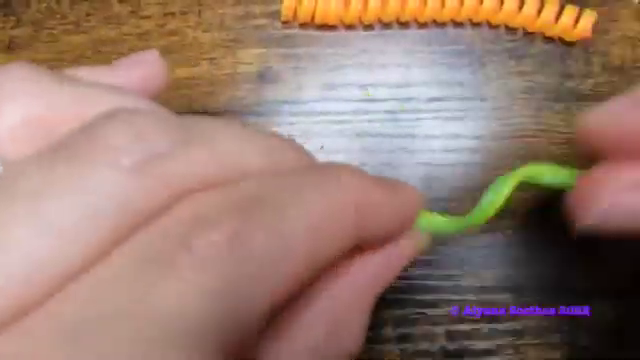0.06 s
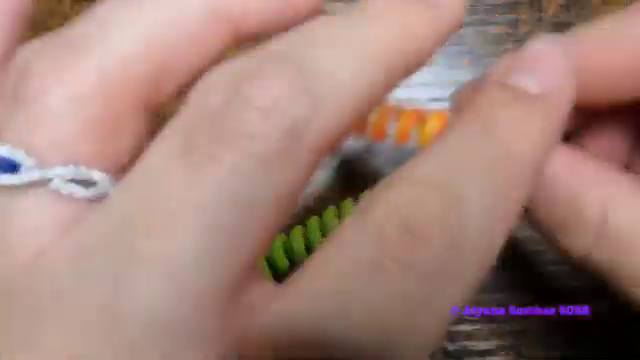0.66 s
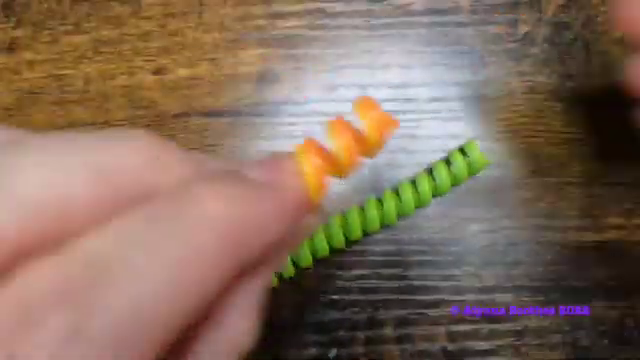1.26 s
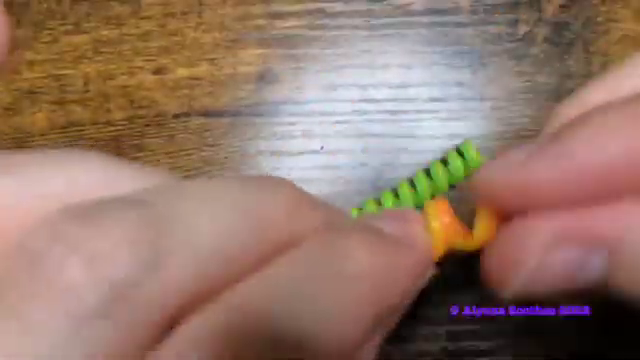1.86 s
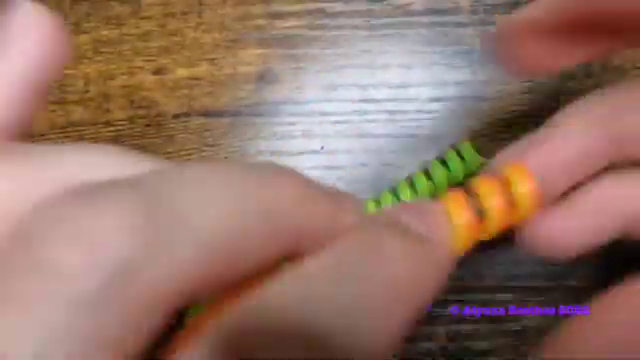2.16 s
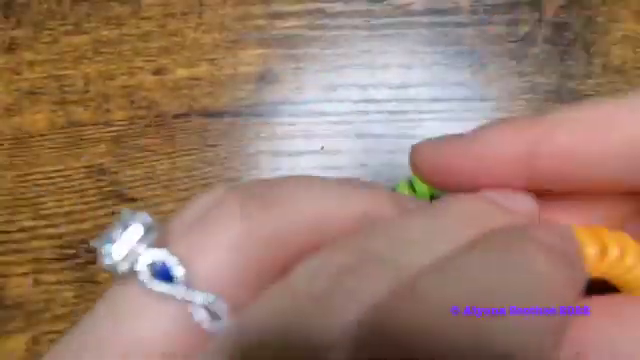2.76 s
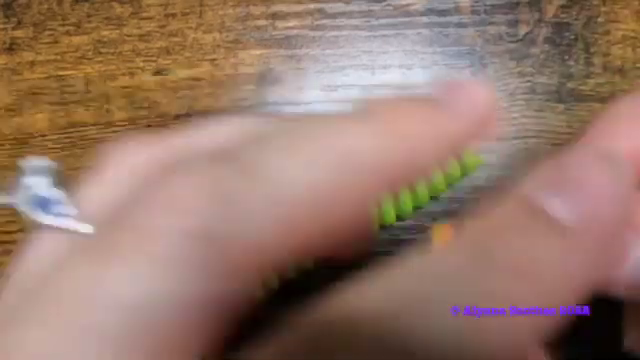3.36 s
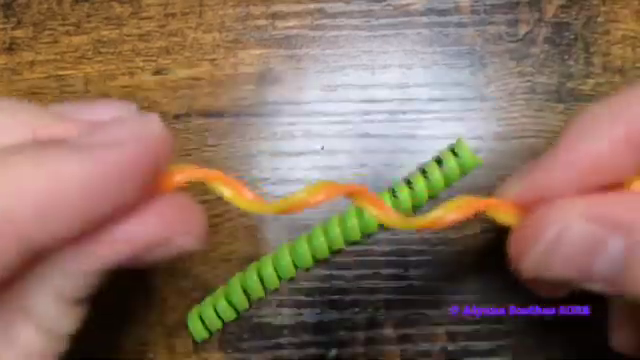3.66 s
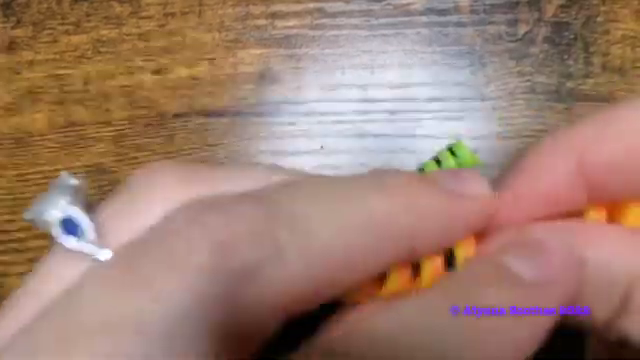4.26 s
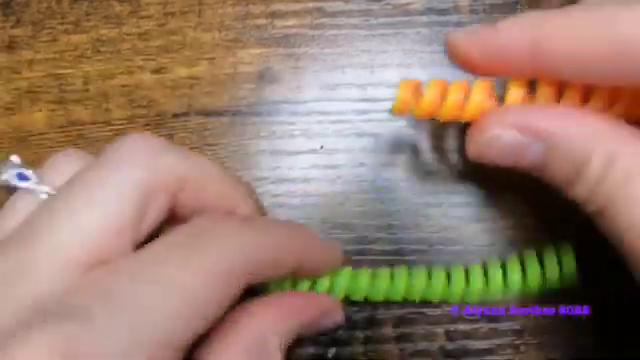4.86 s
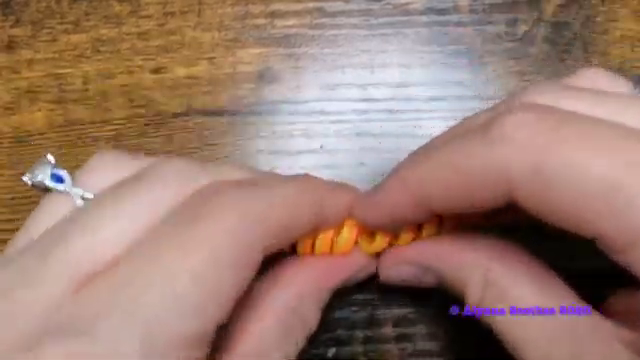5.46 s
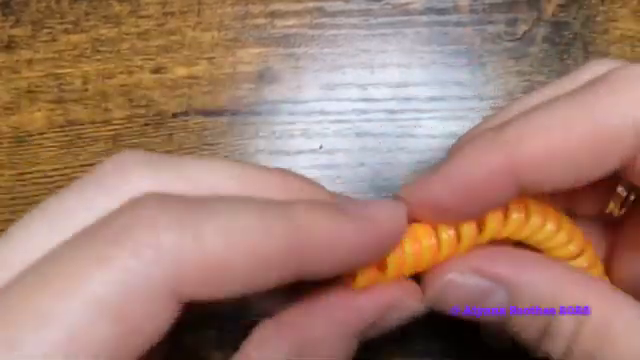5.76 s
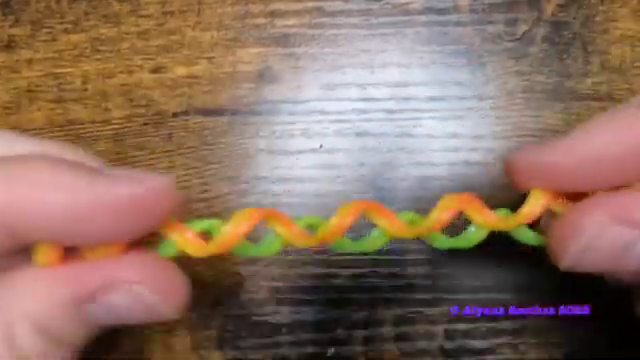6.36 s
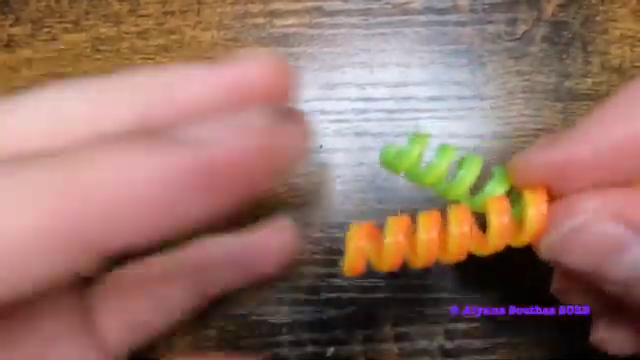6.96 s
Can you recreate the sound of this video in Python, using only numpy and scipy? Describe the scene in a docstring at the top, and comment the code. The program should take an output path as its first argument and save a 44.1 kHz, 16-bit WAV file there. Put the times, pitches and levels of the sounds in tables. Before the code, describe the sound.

Two plastic spiral springs are handled close to the microphone, just above a wooden table in a small, fairly dry room. A steady low hum and a faint rumble of stirred air run throughout. Light ticks and a small snap at 0.3 seconds are followed by a soft thump at 0.5 and a sharp knock on the wood at 0.6. Coils snap shut crisply at about 1.1, 1.6, 2.1 and 3.2 seconds, with soft finger rubbing and stray clicks between. From 3.6 to 4.7 seconds, uneven runs of ticks come as a spring is stretched, with a snap at 4.0 and the loudest at 4.6. Around 4.9 seconds fingertips and springs thump the table, then the springs roll faintly on the wood with light bumps until 5.6. A strong snap comes at 6.4, two more at 6.7 and 6.8, then faint rubbing.

```python
"""In a small room, just above a wooden table, two plastic spiral springs are stretched, let go and rolled
between fingers. Released coils snap shut with a puff of air and turns tick over each other, each impact
exciting the spring's resonances. Springs and fingertips knock on the tabletop and set its modes ringing;
skin slides on plastic by stick-slip friction. The moving hands stir the air, and a low hum fills the room."""
import sys
import numpy as np
from scipy import signal
from scipy.fft import rfft, irfft, next_fast_len
from scipy.io import wavfile
from scipy.ndimage import uniform_filter1d, map_coordinates

SR = 44100
rng = np.random.default_rng(int(sys.argv[2]) if len(sys.argv) > 2 else 0)


def bounce(signal):
    """Save signal as a 16-bit WAV file at the path given by the first command-line argument."""
    frames = np.transpose(np.atleast_2d(signal))
    limited = np.clip(frames, -1, 1)
    pcm = np.round(limited * 32767).astype(np.int16)
    wavfile.write(sys.argv[1], SR, pcm)


N = 313551
T = np.arange(N) / SR
IMPACT_T = T[:SR // 3]

# A spring snaps shut; levels are relative within each column:
# time_s, level_db, knock_db, body_db, sheen_db, push_db, pan_db, release_db
SNAPS = [(0.2958, -35, -22, -17, -22, -38.5, -2.5, -16), (1.1469, -24.5, -23, -16, -15, -33, -0.5, -17.5),
         (1.6457, -25, -29, -24, -13, -36.5, 0.5, -20), (2.0662, -30.5, -19, -13.5, -20.5, -37.5, 0, -24),
         (3.203, -21, -15.5, -17.5, -17, -32.5, -1, -20.5),
         (3.9925, -28.5, -19.5, -14.5, -16.5, -34, -1, -13.5),
         (4.6043, -16.5, -26.5, -16.5, -26, -33.5, -2.5, -22),
         (6.3934, -20.5, -24.5, -16, -28.5, -49.5, 5, -41), (6.7038, -28, -27, -23, -16, -40, 0.5, -18),
         (6.8003, -23, -23.5, -30, -16, -37, -0.5, -40)]


def snaps():
    """Elastic recoil: the end slips off a fingertip, and 5 ms later the turns slam together."""
    out = np.zeros((2, N))
    edge_db = -14.5
    for s, db, knock_db, body_db, sheen_db, push_db, pan_db, release_db in SNAPS:
        registers_db = [knock_db, body_db, edge_db, sheen_db]
        release = coil_click(registers_db, chatter=5.9, chatter_t60_s=0.012)
        slam = coil_click(registers_db, chatter=2.2, chatter_t60_s=0.0079)
        puff = air_push(width_s=0.0019, tail=3.5)
        add(out, s - 0.0052, placed(amp(db + release_db + 29) * release, pan_db))
        add(out, s - 0.0001, placed(amp(db + 23.5) * slam, pan_db))
        add(out, s - 0.0045, placed(amp(push_db + 6.5) * puff, -2.8))
    return out


def coil_click(registers_db, chatter, chatter_t60_s):
    """Forced resonance: one contact and the chatter of neighbouring turns drive the spring's modes."""
    # The spring's resonances: centre_hz, width_hz, level_db
    modes = [(555, 190, 2), (1040, 79, 2), (1417, 1200, -9), (2810, 475, 3), (3590, 1500, -4),
             (5120, 1030, 1), (5620, 1250, 0.5), (7510, 610, -0.5), (8920, 710, -4), (10770, 470, 2.5),
             (12350, 530, -5), (13500, 710, -6)]
    # Its knock, body, edge and sheen registers, whose levels the grip sets: low_hz, high_hz
    registers = [(1000, 2000), (2000, 4000), (4000, 8000), (8000, 15000)]
    t = IMPACT_T[:SR // 20]
    onset = 1 - np.exp(-t / 0.00064)  # the turns meet one after another
    rattle = unit(rng.standard_normal(len(t)) * onset * amp(-60 * t / chatter_t60_s))
    force = chatter * rattle / np.sqrt(len(t))
    force[round(0.0005 * SR)] += 1  # the main contact
    retune = np.exp(0.034 * rng.standard_normal(len(modes)))  # each grip shifts the modes

    def resonances(hz):
        return sum((-1) ** k * amp(db) * 1j * hz * width
                   / ((centre * retune[k]) ** 2 - hz * hz + 1j * hz * width)
                   for k, (centre, width, db) in enumerate(modes))

    click = filtered(np.pad(force, (32, 0)), resonances)
    sizes = [np.linalg.norm(filtered(click, lambda hz: (hz > lo) & (hz < hi))) for lo, hi in registers]
    gains_db = registers_db - 20 * np.log10(sizes)
    centres_hz = np.sqrt(np.prod(registers, axis=1))
    colour = [(880, gains_db[1]), *zip(centres_hz, gains_db)]  # the lowest modes follow the body
    radiation = lambda hz: hz ** 2 / np.hypot(hz ** 2, 1104 ** 2)  # a thin coil radiates little bass
    return filtered(click, lambda hz: amp(along(colour, hz)) * radiation(hz))


def air_push(width_s, tail):
    """Rarefaction, then compression: the recoiling spring pulls air in and pushes it back more slowly."""
    u = IMPACT_T / width_s - 2
    spread = np.where(u < 0, 1, tail)
    onset = np.minimum(IMPACT_T / width_s, 1)
    return onset * u * np.exp(-u * u / spread / 2) / np.sqrt(spread)


def ticks():
    """Impulse excitation: single turns flick past each other, most often while a spring is drawn out."""
    # One turn slips loudly over another: time_s, level_db, body_db, sheen_db
    loud_ticks = [(0.156, -37, -20, -22), (0.3748, -42.5, -5, -29), (0.397, -36.5, -10.5, -21),
                  (1.2257, -35.5, -11, -19), (1.306, -36, -17.5, -30.5), (1.7957, -40, -13.5, -23),
                  (2.2147, -46, -13, -22), (2.7174, -31.5, -7, -29), (3.5966, -41.5, -16, -28),
                  (3.6774, -39.5, -14, -29), (3.795, -39.5, -34, -37), (4.0522, -34.5, -17, -22),
                  (4.076, -35, -10.5, -39), (4.3045, -41.5, -10, -18), (4.4515, -32, -17, -23),
                  (5.194, -37, -4, -32), (5.2765, -38, -5.5, -37), (5.8034, -36.5, -6.5, -28),
                  (6.34, -44.5, -11, -24), (6.7898, -32, -4, -18)]
    # A spring is drawn out: start_s, end_s, level_db
    pulls = [(0.0, 0.52, -51), (3.581, 3.805, -41), (3.995, 4.7, -43)]
    rows = list(loud_ticks) + small_ticks(0, T[-1], per_s=2.5, db=-51.5)  # stray ticks throughout
    for start, end, db in pulls:
        rows += small_ticks(start, end, per_s=14, db=db)
    out = np.zeros(N)
    for s, db, body_db, sheen_db in rows:
        click = coil_click([body_db - 17, body_db - 11, -13, sheen_db], chatter=1, chatter_t60_s=0.018)
        add(out, s - 0.0008, amp(db + 20.5) * click)
    return placed(out, 0)


def small_ticks(start, end, per_s, db, spread_db=2, body_db=-13, sheen_db=-27):
    """Static friction gives way turn by turn: rows of ticks at uneven intervals."""
    delay, size = rng.random((40, 2)).T
    times = start + (np.arange(len(delay)) + delay) / per_s
    levels_db = db + spread_db * (2 * size - 1)
    return [(s, level_db, body_db, sheen_db) for s, level_db in zip(times, levels_db) if s < end]


def knocks():
    """Contact stiffness sets bandwidth: soft fingertips thump the table; hard, light plastic clacks."""
    # Blows on the table: start_s, level_db, hardness_hz, bass_db
    blows = [(0.489, -35.5, 190, 2.5), (0.5181, -51.5, 710, -18), (.6018, -42.5, 4000, -22),
             (.6142, -41, 4500, -24), (.619, -29.5, 3000, -24), (4.841, -32, 402, -2),
             (4.855, -27.5, 424, 5.5), (4.856, -50, 1400, 3), (4.884, -48, 2400, -13),
             (4.912, -45.5, 2820, -1.5), (5.361, -48, 280, -14), (5.4841, -46, 420, 2),
             (6.395, -32, 173, -32)]
    out = np.zeros(N)
    for s, db, hardness_hz, bass_db in blows:
        weight = lambda hz: ((amp(bass_db / 2) + 1j * hz / 160) / (1 + 1j * hz / 160)) ** 2
        contact = lambda hz: weight(hz) / (1 + 1.4j * hz / hardness_hz - (hz / hardness_hz) ** 2)
        blow = filtered(table_ring(), contact)
        add(out, s, amp(db) * blow / np.std(blow[:SR // 50]))
    return placed(out, -0.77)


def table_ring(dense_db=10.5, dense_t60_s=0.13, crack_db=22, crack_t60_s=0.021):
    """Damped free vibration of the tabletop: separate modes, a dense ring and a short crack."""
    # The tabletop's modes: pitch_hz, level_db, t60_s
    modes = [(77, 6, 0.166), (115.6, 7, 0.19), (170.9, 6.5, 0.23), (223.3, 5, 0.096), (302, 0, 0.16),
             (394, -4.5, 0.056), (453, -12, 0.025), (526, -4, 0.07), (591, -2, 0.088), (985, 4, 0.094),
             (1238, 1.5, 0.09), (1970, -15, 0.057), (2390, 1, 0.095), (3000, -19, 0.17),
             (4600, -22.5, 0.085)]
    # Spectrum of the wood's densely packed modes: frequency_hz, level_db
    grain = [(150, -5), (450, -2.5), (780, -9.5), (1200, -5.5), (2800, -1), (4000, -2.5), (6500, 2.5),
             (9000, -8), (14000, -10)]
    ring = 0
    for k, (hz, db, t60) in enumerate(modes):
        decay = amp(db + 2 * rng.standard_normal() - 60 * IMPACT_T / t60)
        ring -= (-1) ** k * decay * np.sin(2 * np.pi * hz * IMPACT_T)
    dense = coloured(rng.standard_normal(len(IMPACT_T)), grain)
    dense_decay = amp(dense_db - 60 * IMPACT_T / dense_t60_s)
    crack_decay = amp(crack_db - 60 * IMPACT_T / crack_t60_s)
    return ring + dense * (dense_decay + crack_decay)


def rolling():
    """Rolling noise: ribbed springs pressed on the wood drum it with a stream of tiny contacts."""
    # Strength of the rolling: time_s, level_db
    strength = [(4.86, -33.5), (4.87, -51), (4.996, -54.5), (5.08, -72.5), (5.086, -63), (5.248, -64.5),
                (5.466, -64), (5.514, -50), (5.62, -82)]
    # Response of the pressed tabletop: frequency_hz, level_db
    wood_spectrum = [(100, 9), (300, 7.5), (500, -3.5), (700, -5.5), (1020, -4), (1230, 3.5), (1480, -3.5),
                     (1950, -3), (2850, -8), (3800, -9.5), (5500, -14.5), (8000, -24), (13000, -38),
                     (15500, -58)]
    level_db = np.interp(T, *np.transpose(strength))
    touching = np.interp(T, [4.85, 4.87, 5.56, 5.64], [0, 1, 1, 0])
    wood = coloured(impulses(per_s=3000, spread_db=-1.5), wood_spectrum)
    return placed(touching * amp(level_db + 5 + 2.1 * wobble(50)) * wood, -0.15)


def sliding():
    """Stick-slip friction: skin rubs on plastic, its power rising with speed; dry, light strokes hiss."""
    # A finger slides along a spring: fastest_s, rise_s, fall_s, rub_db, hiss_db
    strokes = [(0.602, 0.028, .02, -56, -75), (.92, 0.045, 0.02, -83, -70), (1.09, 0.072, 0.073, -63, -95),
               (1.21, .066, 0.096, -57, -68.5), (1.48, 0.037, 0.051, -68.5, -89),
               (2.381, 0.034, 0.021, -71, -64.5), (2.45, .05, 0.092, -71.5, -74.5),
               (2.725, .02, 0.083, -58.5, -82), (3.49, 0.17, 0.055, -64.5, -79),
               (3.68, 0.072, 0.064, -72, -76.5), (4.07, 0.13, 0.09, -62, -76),
               (4.15, 0.041, 0.08, -78, -64), (4.29, 0.14, 0.074, -63, -78), (4.68, .11, 0.12, -55, -68),
               (4.91, 0.12, 0.14, -59.5, -67.5), (5.78, 0.17, .12, -68.5, -79),
               (6.87, 0.12, 0.089, -86, -73.5), (7.11, .11, .066, -62.5, -80)]
    # Spectra of rubbing and of hissing skin: frequency_hz, level_db
    rub_spectrum = [(300, -16), (800, -8.5), (1250, 11), (1700, 10), (2700, 10.5), (3800, 4.5), (5300, 5.5),
                    (7000, -2.5), (8600, -9.5), (14000, -31)]
    hiss_spectrum = [(2000, -21), (5000, 6), (7300, 14), (8500, 3), (10000, 8.5), (11800, 6), (13400, 3.5),
                     (14400, -13), (15500, -34)]
    moves = [(swell(s, rise, fall), rub_db, hiss_db) for s, rise, fall, rub_db, hiss_db in strokes]
    moves.append((fidgeting(), -77.5, -84))
    for s, db, *_ in SNAPS:
        creep = np.where(T < s, amp(-9) ** 2, 1)  # the fingertip creeps before a snap, slides after it
        moves.append((swell(s, rise_s=0.11, fall_s=0.099) * creep, db - 40, db - 47.5))
    rub_power = sum(speed * amp(rub_db) ** 2 for speed, rub_db, _ in moves)
    hiss_power = sum(speed * amp(hiss_db) ** 2 for speed, _, hiss_db in moves)
    rub_gain = np.sqrt(rub_power) * amp(1.15 * wobble(60))
    rub = rub_gain * coloured(impulses(per_s=9000, spread_db=0), rub_spectrum)
    hiss_gain = np.sqrt(hiss_power) * amp(0.61 * wobble(51))
    hiss = hiss_gain * coloured(impulses(per_s=3500, spread_db=3.5), hiss_spectrum)
    return placed(rub, 0.202) + placed(hiss, 1.0)


def fidgeting(swing_db=3):
    """Friction power of fingers shifting their grip: around 1, and 0 while they hold still."""
    # The grip rests: start_s, end_s
    holds = [(3.82, 4.4), (5.96, 6.2), (6.56, 7.3)]
    moving = np.ones(N)
    for start, end in holds:
        moving[(T > start) & (T < end)] = 0
    return np.abs(uniform_filter1d(moving, size=SR // 20)) * amp(swing_db * wobble(8)) ** 2


def stirred_air():
    """Air displacement: hands push low gusts as they sweep past and as they jerk apart at each snap."""
    # A hand sweeps past: fastest_s, length_s, level_db
    sweeps = [(0.326, 0.82, -39), (1.3, 0.48, -41), (3.598, 0.14, -33), (4.367, 0.58, -39),
              (4.91, 0.32, -33), (5.086, 0.31, -36.5), (5.453, 0.22, -35), (6.472, 0.25, -33)]
    # Spectrum of the gusts: frequency_hz, level_db
    gust_spectrum = [(12, -1), (25, -6), (40, -3), (53, 1.5), (68, -11), (95, -14), (160, -17.5),
                     (400, -76)]
    steady_power = amp(-43.5) ** 2
    sweep_power = sum(swell(s, length / 2, length / 2) * amp(db) ** 2 for s, length, db in sweeps)
    recoil_power = sum(swell(s, rise_s=0.03, fall_s=0.12) * amp(push_db - 2) ** 2
                       for s, *_, push_db, _, _ in SNAPS)
    gain = amp(-5.5) * np.sqrt(steady_power + sweep_power + recoil_power)
    return placed(gain * stereo_noise(gust_spectrum), -1.1)


def background(hum_hz=120):
    """A standing wave of mains hum, over steady room noise whose low middle comes from the right."""
    # Spectrum of the room noise: frequency_hz, level_db
    noise_spectrum = [(30, 4), (90, -7.5), (130, 9.5), (175, -1.5), (235, 1.5), (310, -6), (420, -13.5),
                      (800, -27), (1200, -20), (2000, -30.5), (4000, -39.5), (7300, -37), (8500, -45.5),
                      (13000, -49), (15500, -73)]
    # Its balance between the ears: frequency_hz, left_over_right_db
    balance = [(60, -3), (110, 0.5), (200, -3.5), (380, -6), (700, -8), (1300, -1), (4400, 1.8),
               (15000, 10.5)]
    ear_phase_rad = np.array([[-0.45], [0.45]])
    phase = 2 * np.pi * hum_hz * T + 0.1 * wobble(2)
    hum = amp(-48.5 + 0.2 * wobble(2.08)) * np.sin(phase + ear_phase_rad)
    ear_gains = lambda hz: amp(along(balance, hz) * np.array([[0.5], [-0.5]]))
    noise = filtered(stereo_noise(noise_spectrum), ear_gains)
    return placed(hum, 1.1) + amp(-55) * noise


def reverberation(x, delay_samples=130):
    """Diffuse reflection: a short tail, different for each ear, whose treble dies first."""
    # The room's reverberation time: frequency_hz, t60_s
    decay_times = [(150, 0.43), (1500, 0.21), (6000, 0.18), (14000, 0.055)]
    hz, t, noise = signal.stft(rng.standard_normal((2, SR // 2)), SR, nperseg=256)
    decay = amp(-60 * t / along(decay_times, hz)[:, None])
    _, tail = signal.istft(noise * decay, SR, nperseg=256)
    response = np.pad(tail, ((0, 0), (delay_samples, 0))) / np.linalg.norm(tail[0])
    return signal.fftconvolve(x, response, axes=1)[:, :N]


def stereo_noise(spectrum):
    """Partial coherence: noise of rms 1 whose likeness in the two ears depends on frequency."""
    # Likeness of left and right: frequency_hz, correlation
    coherence = [(30, 0.93), (250, 0.61), (1000, 0.092), (8000, 0.47)]
    mid, side = coloured(rng.standard_normal((2, N)), spectrum)
    side = filtered(side, lambda hz: np.tan(np.arccos(np.clip(along(coherence, hz), 0, 1)) / 2))
    return unit(np.array([mid + side, mid - side]))


def impulses(per_s, spread_db):
    """Shot noise: random slips or contacts of uneven size, at rms 1."""
    contacts = (rng.random(N) < per_s / SR) * rng.standard_normal(N)
    return unit(contacts * amp(spread_db * np.clip(rng.standard_normal(N), -2, 2)))


def swell(s, rise_s, fall_s):
    """A movement that speeds up to 1 at time s and slows to rest again."""
    return np.interp(T, [s - rise_s, s, s + fall_s], [0, 1, 0]) ** 1.36


def wobble(knots_per_s):
    """A smooth random modulation."""
    return map_coordinates(rng.standard_normal(int(N * knots_per_s / SR) + 4), [T * knots_per_s])


def amp(db):
    """Decibels to amplitude."""
    return 10 ** (np.asarray(db) / 20)


def unit(x):
    """Normalisation to rms 1."""
    return x / np.sqrt(np.mean(x ** 2) + 1e-20)


def along(points, hz):
    """Interpolation of (frequency_hz, value) points on a log axis."""
    frequencies, values = np.transpose(points)
    return np.interp(np.log(hz + 1), np.log(frequencies + 1), values)


def filtered(x, response):
    """Linear filtering: the spectrum of x times a complex frequency response."""
    n = x.shape[-1]
    size = next_fast_len(n + 8192)
    return irfft(rfft(x, size) * response(np.fft.rfftfreq(size, 1 / SR)), size)[..., :n]


def coloured(x, spectrum):
    """Spectral shaping by (frequency_hz, level_db) points, at rms 1."""
    return unit(filtered(x, lambda hz: amp(along(spectrum, hz))))


def placed(x, pan_db):
    """Interaural level difference: positive pan_db favours the left."""
    return x * amp([[pan_db / 2], [-pan_db / 2]])


def add(track, s, x):
    """Superposition of x on the track from time s."""
    start = max(round(s * SR), 0)
    track[..., start:start + x.shape[-1]] += x[..., :N - start]


def scene():
    """Direct and reverberant fields add: springs close by, the table below, the room around."""
    # Phase by which the direct sound leads on the left: frequency_hz, lead_rad
    left_lead = [(100, -0.52), (860, -0.52), (3000, -0.93), (4500, -0.44), (10000, -0.57), (14000, 1)]
    springs = snaps() + ticks()
    wood = knocks() + rolling()
    fingers = sliding()
    reflected = reverberation(amp(-18) * springs + amp(-13) * wood + amp(-14.5) * fingers)
    phase_shift = lambda hz: np.exp(0.5j * along(left_lead, hz) * np.array([[1], [-1]]))
    direct = filtered(springs + wood + fingers, phase_shift)
    return direct + reflected + stirred_air() + background()


def record(dry):
    """Band limiting: a steep low-pass removes the highest treble."""
    cutoff_hz = 15400
    return filtered(dry, lambda hz: 1 / np.sqrt(1 + (hz / cutoff_hz) ** 80))


dry = scene()
out = record(dry)
bounce(out)
```